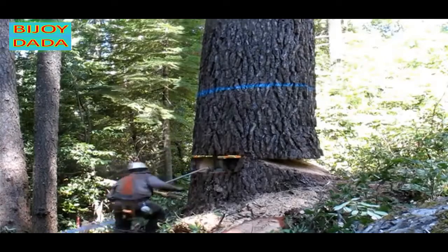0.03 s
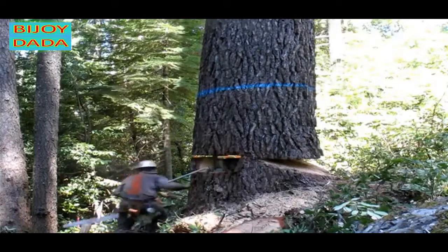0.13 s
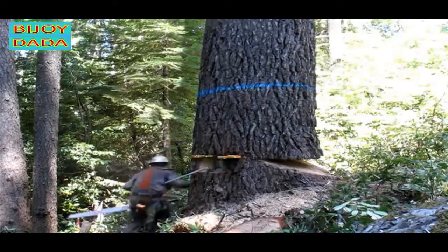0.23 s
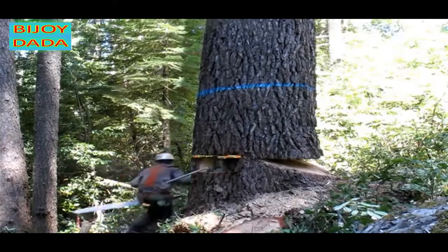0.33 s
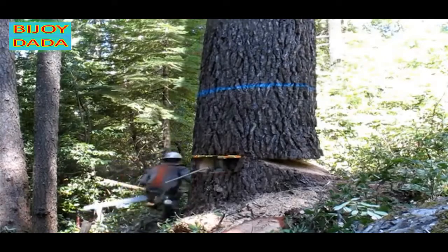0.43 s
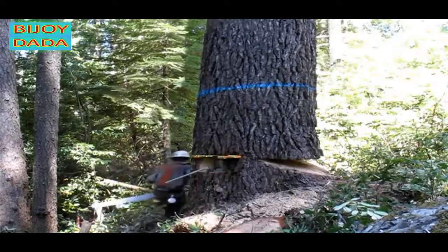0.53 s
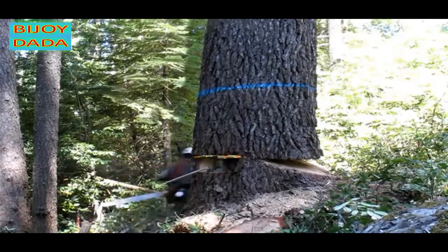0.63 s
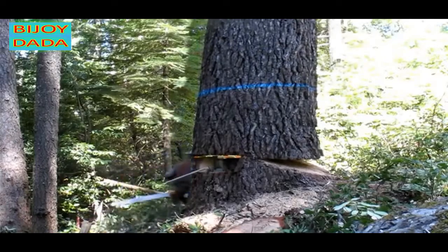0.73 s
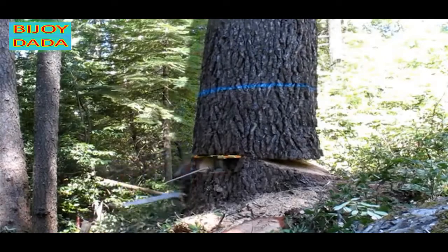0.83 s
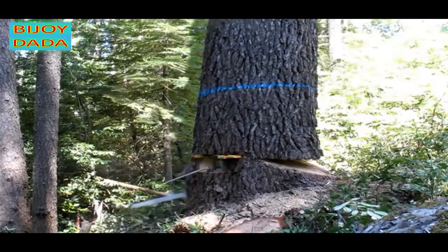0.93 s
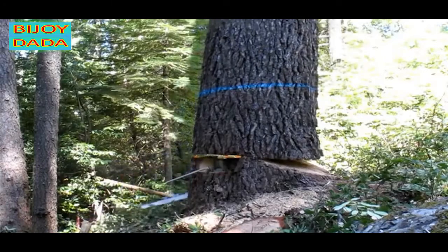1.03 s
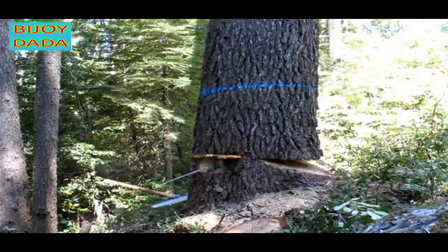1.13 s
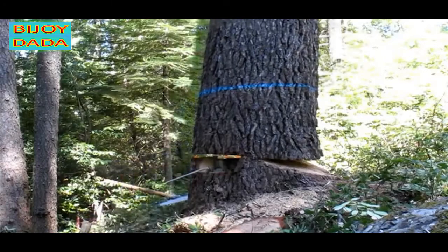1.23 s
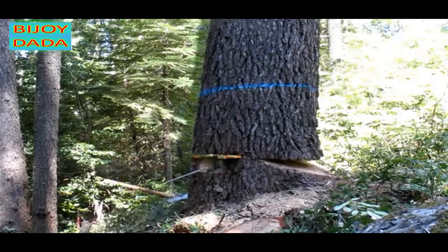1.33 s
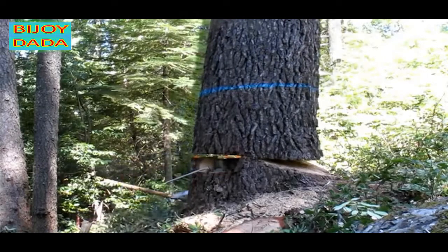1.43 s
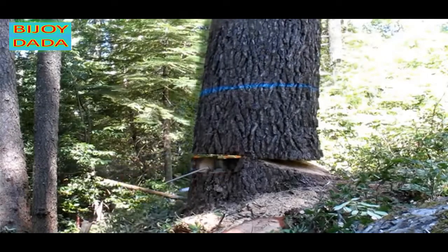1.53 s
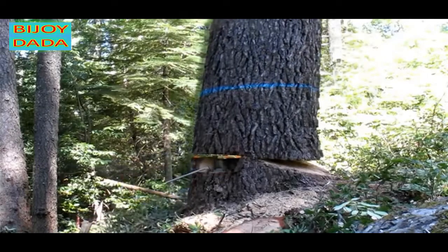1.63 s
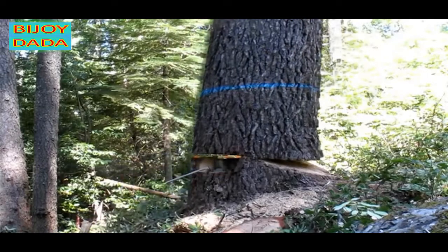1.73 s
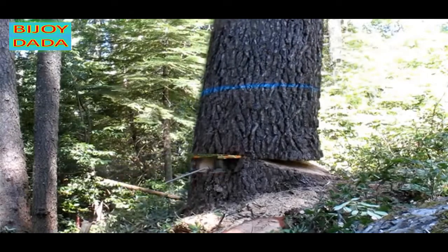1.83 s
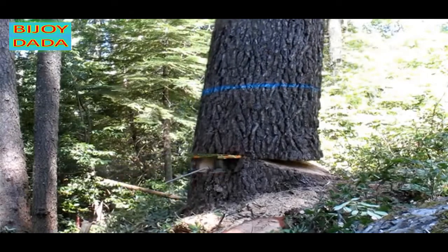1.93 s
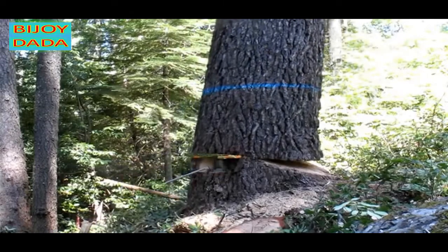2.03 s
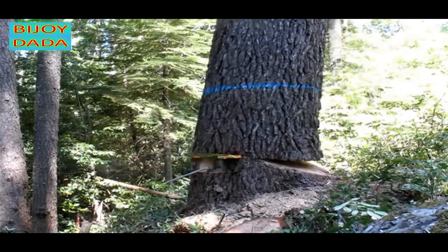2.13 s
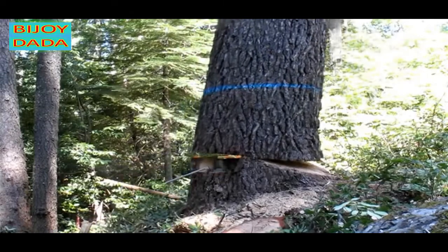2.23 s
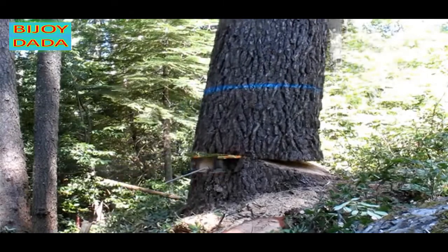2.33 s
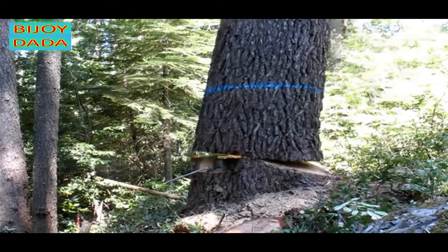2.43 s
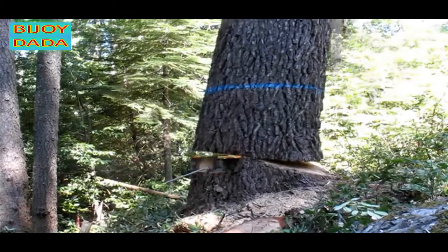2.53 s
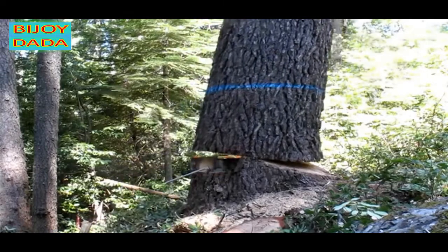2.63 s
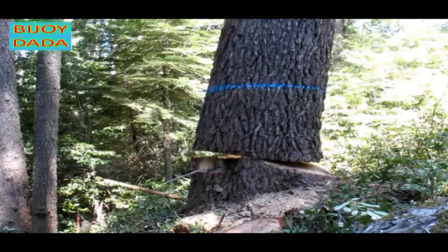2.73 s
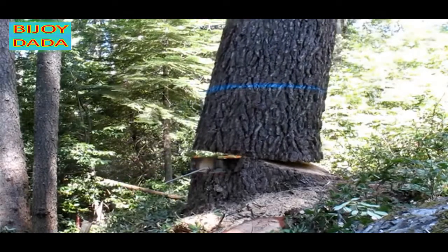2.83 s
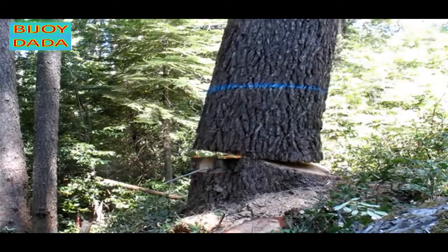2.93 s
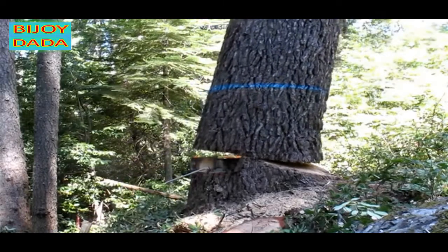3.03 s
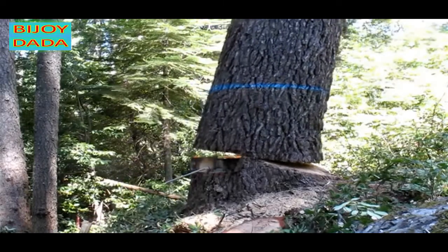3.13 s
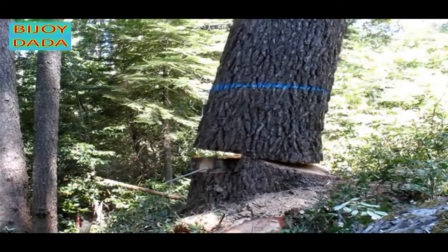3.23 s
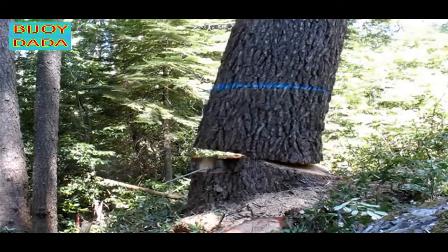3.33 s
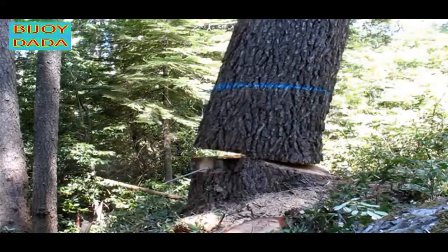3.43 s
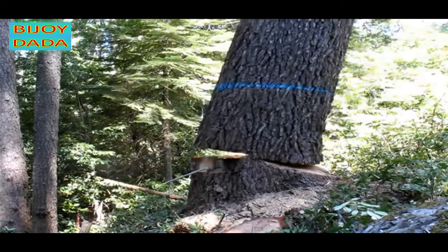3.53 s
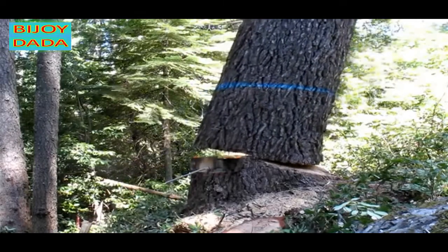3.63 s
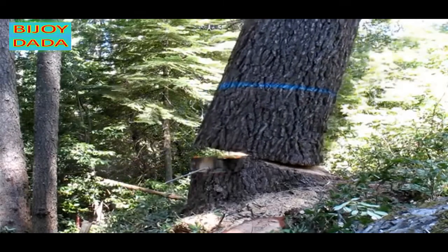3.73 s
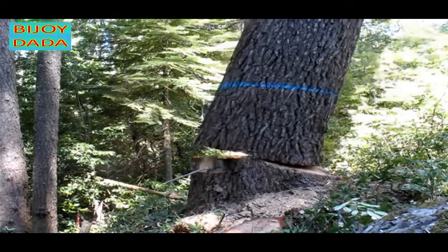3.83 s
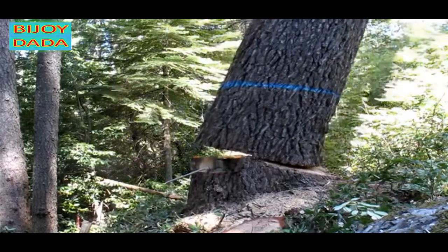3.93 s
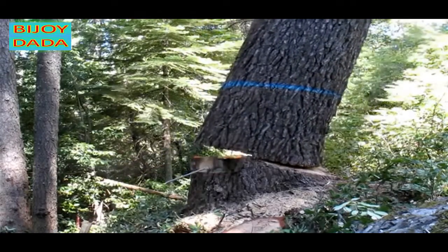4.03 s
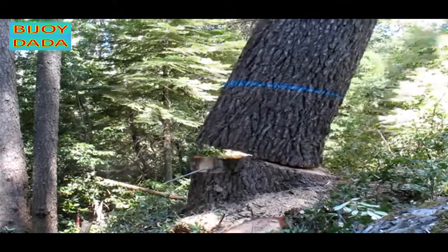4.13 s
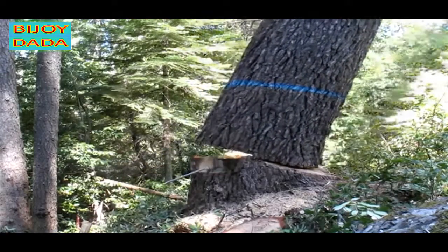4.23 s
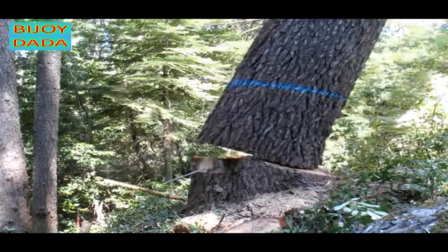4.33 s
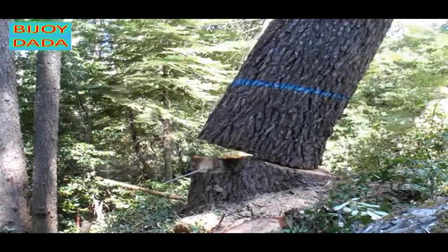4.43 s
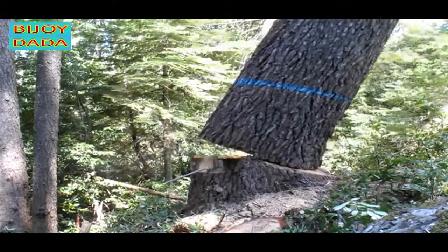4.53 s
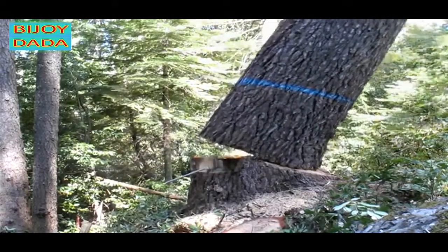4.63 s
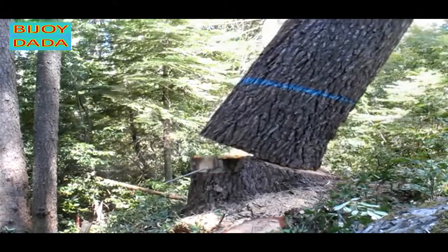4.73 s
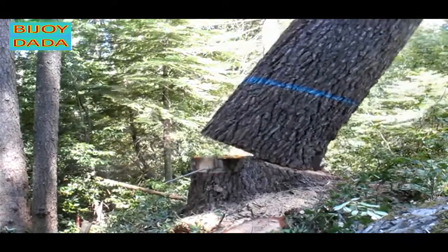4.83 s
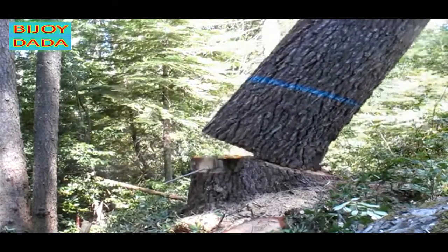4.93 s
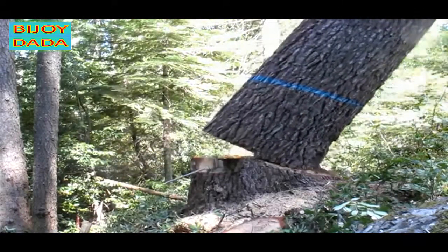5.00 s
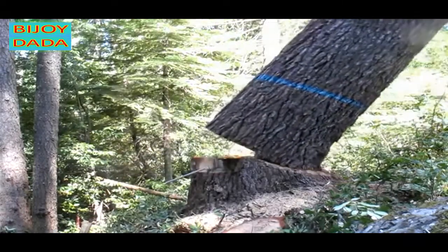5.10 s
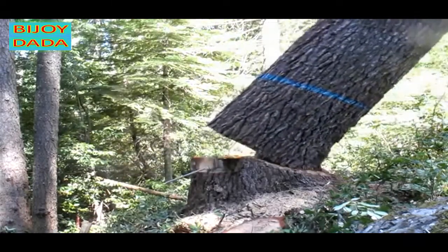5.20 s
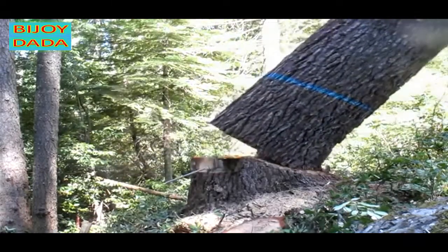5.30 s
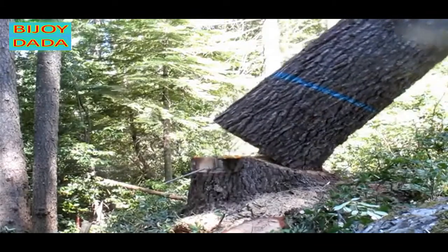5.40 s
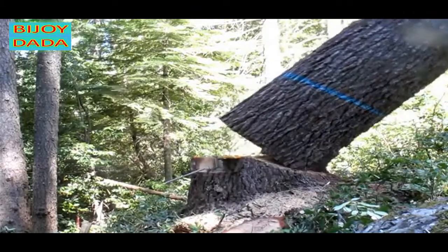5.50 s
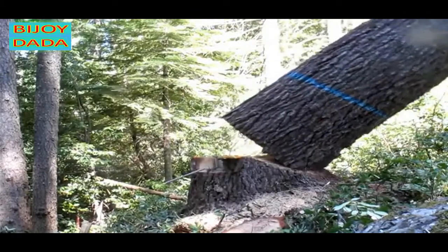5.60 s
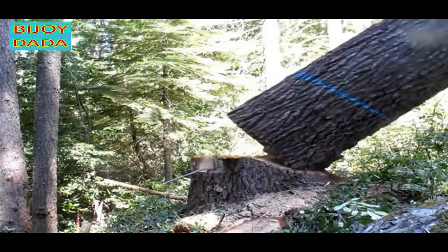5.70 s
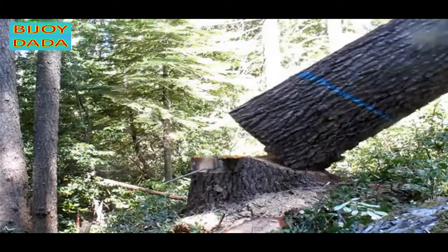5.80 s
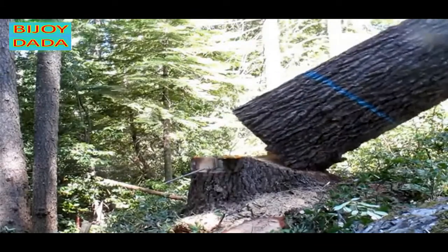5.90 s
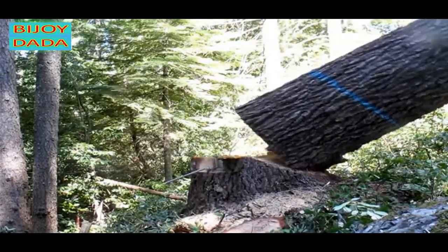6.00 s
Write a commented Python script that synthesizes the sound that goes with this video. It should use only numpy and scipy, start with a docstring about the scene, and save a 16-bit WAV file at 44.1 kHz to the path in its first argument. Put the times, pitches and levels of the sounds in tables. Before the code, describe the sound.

In a still forest, someone moves away through brush with faint rustles and small twig snaps. A big tree gives a sharp, hollow crack, then more, followed by a run of popping, splintering and tearing fibres as it tips. Its crown swishes into neighbouring trees with clattering, breaking branches, while the trunk bumps dully on the stump. The microphone is near the stump, and the cracks echo briefly.

```python
"""The hinge wood of a big conifer cracks, splinters and tears as the felled trunk tips.
Each break is a run of tiny slips: the piece knocks, the trunk thuds, fine fibres spit. The butt bumps on
the stump and the crown ploughs through its neighbours with swishing needles and breaking limbs.
Early on, the feller retreats through rustling brush, snapping twigs. Surrounding trunks scatter the
cracks back to a microphone near the stump, over still air and a faint electronic whine."""
import sys
import numpy as np
from scipy import signal
from scipy.fft import rfft, irfft
from scipy.io import wavfile
from scipy.ndimage import uniform_filter1d

SR = 44100
rng = np.random.default_rng(int(sys.argv[2]) if len(sys.argv) > 2 else 0)


def generate_wav(signal):
    """Clip the signal to [-1, 1] and save it as 16-bit WAV at the path in sys.argv[1]."""
    frames = np.transpose(np.atleast_2d(signal))
    scaled = np.clip(frames, -1, 1) * 32767
    pcm = np.round(scaled).astype(np.int16)
    wavfile.write(sys.argv[1], SR, pcm)


N = 267201
TIME_S = np.arange(N) / SR
HINGE_OPENS_S, HINGE_PARTS_S, CROWN_STRIKES_S = 2.52, 4.75, 5.282


# deep hinge breaks: (time [s], knock level [dB], knock pitch [Hz], length [ms])
HINGE_CRACKS = [(1.723, -23, 1630, 4.3), (2.3169, -24.5, 1170, 6.7), (2.5957, -32.5, 1680, 11),
                (2.9053, -28.5, 1170, 6.9), (3.1168, -29.5, 1650, 10.7), (3.3165, -37.5, 1250, 11),
                (3.4124, -32.5, 1250, 8.7), (3.5063, -40.5, 1670, 6.2), (3.7703, -38.5, 1760, 33),
                (3.7992, -33.5, 1340, 11), (3.9989, -44, 1540, 8.9), (4.201, -46.5, 1390, 6),
                (4.3951, -42.5, 1770, 18)]
# hinge resonances: (frequency [Hz], width [Hz], gain [dB])
HINGE_MODES = [(1024, 140, 2.5), (3210, 770, 2)]

def hinge_cracks(thud_re_knock_db=-4.5, creak_hz=1520, creak_ms=11):
    """The hinge cracks and rings hollow; its last strap creaks in small breaks: (direct, diffuse)."""
    creaks = [(s, -49 + db, creak_hz, creak_ms) for s, db in scattered(4.2, 5.1, spread_db=1, count=12)]
    direct, diffuse = breaks([(s, db, hz, db + thud_re_knock_db, -26 + 0.48 * db, ms)
                              for s, db, hz, ms in HINGE_CRACKS + creaks])
    hollow = sum(amp(db) * ring(direct, hz, width_hz) for hz, width_hz, db in HINGE_MODES)
    return np.array([amp(-3) * (direct + hollow), diffuse])


# loudest fibre snaps: (time [s], knock level [dB], spit level [dB])
FIBRE_SNAPS = [(2.2389, -44, -42.5), (2.478, -44, -46.5), (2.5397, -36.5, -35.5), (2.717, -26.5, -30.5),
               (2.7823, -38, -43), (2.8112, -43, -36.5), (2.8912, -39.5, -36), (3.0079, -44, -35.5),
               (3.1414, -39, -38.5), (3.1986, -50, -37.5), (3.2553, -43, -62), (3.393, -38.5, -35),
               (3.435, -38, -29.5), (3.5369, -39.5, -34.5), (3.6963, -45, -41.5), (3.9006, -47, -35.5),
               (3.9585, -38, -40), (3.981, -37, -33), (4.0387, -39.5, -42), (4.1209, -45.5, -45),
               (4.3633, -38, -32.5), (4.6726, -44, -38.5), (4.781, -43, -37.5), (4.8637, -42, -40.5),
               (5.058, -50, -36.5), (5.2443, -34, -33.5), (5.6377, -37.5, -30), (5.9869, -36, -32.5)]

def splinters(ref_db=-36.5, ref_hz=2110, ref_ms=2.04, thud_re_knock_db=-19):
    """Light fibres barely shake the trunk; stronger, thicker ones knock lower and longer."""
    strays = [(s, -52 + db, -45 + db)
              for s, db in scattered(HINGE_OPENS_S, CROWN_STRIKES_S, spread_db=4, count=26)]
    rows = []
    for s, db, spit_db in FIBRE_SNAPS + strays:
        excess_db = db - ref_db
        hz = ref_hz * 2 ** (-.012 * excess_db)
        length_ms = ref_ms * 2 ** (excess_db / 10.5)
        rows.append((s, db, hz, db + thud_re_knock_db, spit_db, length_ms))
    return breaks(rows)


def breaks(rows):
    """Fractures heard directly, and diffusely: averaging over all directions blurs slips and modes."""
    direct, diffuse = np.zeros((2, N))
    for s, *blow, length_ms in rows:
        add(direct, s, fracture(slip_run(length_ms), *blow, ringing=2.2))
        add(diffuse, s, fracture(signal.unit_impulse(3072), *blow, ringing=.4))
    return np.array([direct, diffuse])


# trunk resonances: (frequency [Hz], width [Hz], gain [dB])
TRUNK_MODES = [(88.5, 48, -16), (246.4, 39, -7), (373, 79, -6.5), (450.5, 110, -1.5), (568, 197, -4),
               (707, 52, 0.5), (1071, 96, -16)]
# fine-fibre spectrum: (frequency [Hz], gain [dB])
SPIT_SPECTRUM = [(1000, -38), (2800, -12), (4200, 1.5), (7000, -2), (11000, -0.5), (14000, -5)]

def fracture(slips, knock_db, knock_hz, thud_db, spit_db, ringing):
    """Slips make the piece knock, the trunk thud and fine fibres spit. Levels are rms over 10 ms."""
    bending = ring(slips, knock_hz, .17 * knock_hz) + .7 * ring(slips, 1.7 * knock_hz, .3 * knock_hz)
    knock = ring(ringing * bending + slips, knock_hz, 2.17 * knock_hz)
    wood_absorption = signal.butter(3, min(2.25 * knock_hz, SR / 3), fs=SR, output="sos")
    knock = signal.sosfilt(wood_absorption, knock)
    thud = sum((-1) ** k * amp(db) * ring(slips, hz, width_hz)
               for k, (hz, width_hz, db) in enumerate(TRUNK_MODES))
    spit = colour(slips, SPIT_SPECTRUM, size=512)
    parts = (knock, knock_db), (thud, thud_db), (spit, spit_db)
    return sum(amp(db) * part / np.sqrt(np.sum(part ** 2) / (SR / 100)) for part, db in parts)


def slip_run(length_ms, size=3072):
    """A brief burst of tiny slips, whitened to leave no deep spectral gaps."""
    fade = np.exp(-(np.arange(size) * 1000 / SR / max(length_ms, .3)) ** 1.3)
    run = rng.standard_normal(size) * fade
    for _ in range(2):
        spectrum = rfft(run)
        run = irfft(spectrum / (np.abs(spectrum) + 1e-9) ** .6) * np.sqrt(fade)
    return run


# fibre strips ripping out: (time [s], length [s], level [dB])
STRIP_RIPS = [(2.759, 0.058, -42), (3.146, 0.18, -45.5), (3.395, 0.2, -44.5), (3.785, 0.054, -43),
              (3.957, 0.048, -41.5), (4.105, 0.033, -50)]
# fibre and needle spectrum: (frequency [Hz], gain [dB])
TEAR_SPECTRUM = [(300, -13.5), (1200, -7.5), (2500, -2), (4000, -0.5), (7000, -2.5), (11000, -0.5),
                 (13000, -5)]

def tearing_and_swish(thins_from_s=4.3, thinning_db_per_s=13):
    """Tearing hinge fibres, then sweeping needles: a hiss with clusters of sharper ticks."""
    hiss = grains(rate_hz=6000, spread_db=2.5, length_ms=.8) * amp(.7 * walk(40))
    ticks = grains(rate_hz=110 * amp(6 * walk(25)), spread_db=5.5, length_ms=.9)
    ticks = ticks + amp(-5.5) * undergrowth(ticks)
    texture = unit(colour(hiss + amp(-3.5) * ticks, TEAR_SPECTRUM))
    steady_tear = (HINGE_OPENS_S, HINGE_PARTS_S - HINGE_OPENS_S, -50.5)
    fibres_left = amp(-thinning_db_per_s * np.maximum(TIME_S - thins_from_s, 0))
    rips = swells([steady_tear, *STRIP_RIPS], attack_s=0.013, release_s=0.041) * fibres_left
    needles = crown_gain(start_s=4.5, lead_s=0.067, db_per_s=31, surge_db=3, surge_s=-3, full_db=-35.5)
    strike_swish = swells([(5.3, 0.044, -38.5)], attack_s=0.024, release_s=.08)
    return texture * np.hypot(rips, np.hypot(needles, strike_swish))


# butt on stump: (time [s], peak level [dB], pitch [Hz])
BUTT_BUMPS = [(2.319, -27, 460), (3.799, -30, 374), (5.28, -28.5, 202), (5.31, -28, 170), (5.598, -32, 355),
              (5.655, -26, 370), (5.829, -27.5, 380), (5.969, -20.5, 295)]

def butt_bumps():
    """The heavy butt shifts on the stump, then bumps dully as the notch closes."""
    track = np.zeros(N)
    for s, db, hz in BUTT_BUMPS:
        blow = ring(slip_run(length_ms=10), hz, 0.83 * hz)
        blow = ring(blow, hz, 3.3 * hz)
        add(track, s, amp(db) * blow / np.abs(blow).max())
    return track


# branches breaking in the crown: (time [s], knock level [dB], knock pitch [Hz])
LIMB_BREAKS = [(5.3207, -37, 2030), (5.3729, -28, 1550), (5.4231, -35, 1290), (5.4838, -32.5, 1100),
               (5.6153, -31.5, 1540), (5.6553, -37, 1310), (5.7184, -35, 1470), (5.7684, -32.5, 2100)]

def limb_breaks(thud_re_knock_db=-21, spit_re_knock_db=-10.5, length_ms=5.3):
    """Branches break far off: mostly knock, little thud or spit."""
    return breaks([(s, db, hz, db + thud_re_knock_db, db + spit_re_knock_db, length_ms)
                   for s, db, hz in LIMB_BREAKS])


# colliding-stick spectrum: (frequency [Hz], gain [dB])
STICK_SPECTRUM = [(300, -34.5), (800, -9), (1100, -4.5), (1500, -1), (2100, -9), (2800, -9), (4500, -12),
                  (10000, -20.5)]

def stick_clatter():
    """Sticks of many sizes pop and knock together, surging as the crown strikes."""
    crunch = grains(rate_hz=1500, spread_db=3, length_ms=3)
    pops = sum(ring(grains(rate_hz=70, spread_db=3, length_ms=2), hz, hz / 6)
               for hz in np.geomspace(1100, 3000, 6))
    gain = crown_gain(start_s=4.6, lead_s=-0.013, db_per_s=8.5, surge_db=12, surge_s=0.04, full_db=-35)
    return unit(colour(crunch + .55 * unit(pops), STICK_SPECTRUM)) * gain


# heavy-limb spectrum: (frequency [Hz], gain [dB])
THUMP_SPECTRUM = [(20, -22), (50, -6.5), (110, -7.5), (180, -2), (380, 3), (550, -1.5), (750, -7),
                  (1600, -37)]

def limb_thumps():
    """Heavy limbs collide and thump under the clatter."""
    blows = grains(rate_hz=260, spread_db=3.5, length_ms=5)
    gain = crown_gain(start_s=4.5, lead_s=0.057, db_per_s=8, surge_db=18.5, surge_s=0.34, full_db=-41)
    return unit(colour(blows, THUMP_SPECTRUM)) * gain


def crown_gain(start_s, lead_s, db_per_s, surge_db, surge_s, full_db, fade_s=0.033):
    """The crown grazes ever harder, then surges around the strike; a negative surge_s sags instead."""
    to_strike_s = CROWN_STRIKES_S - lead_s - TIME_S
    withheld = np.clip(.5 + to_strike_s / surge_s, 0, 1)
    db = full_db - surge_db * withheld - db_per_s * np.maximum(to_strike_s, 0)
    return amp(db) * np.clip((TIME_S - start_s) / fade_s, 0, 1)


# twigs underfoot: (time [s], knock level [dB], knock pitch [Hz], spit level [dB])
TWIG_SNAPS = [(0.1255, -60, 1910, -50), (0.1788, -56.5, 2200, -52), (0.286, -77, 2740, -63),
              (0.4111, -61.5, 2710, -51.5), (0.5491, -58, 2000, -69), (0.73, -67, 2500, -53),
              (0.9976, -60.5, 795, -65), (1.5, -62, 2460, -53), (1.553, -57, 2450, -70)]

def twig_snaps(thud_re_knock_db=-18.5, length_ms=1.7):
    """Dry twigs snap short and light under the feller's boots."""
    return breaks([(s, db, hz, db + thud_re_knock_db, spit_db, length_ms)
                   for s, db, hz, spit_db in TWIG_SNAPS])


# strides sweeping brush aside: (time [s], length [s], level [dB])
BRUSH_STRIDES = [(0.485, 0.025, -51.5), (0.68, 0.096, -51), (1.25, 0.15, -55), (1.56, 0.11, -53),
                 (1.88, .1, -53.5)]
# rustle spectrum: (frequency [Hz], gain [dB])
BRUSH_SPECTRUM = [(200, -13.5), (1000, -11), (2200, -8), (4000, -2.5), (6500, -3.5), (10500, 1),
                  (13000, -0.5)]

def brush(start_s=0.614, end_s=2.56, wading_db=-59.5, thickening_db_per_s=2.5, stirring_db=-67.5):
    """Ever thicker brush slides over clothing, swelling with each stride; leaves stir throughout."""
    rustle = grains(rate_hz=6300, spread_db=2.5, length_ms=0.84) * amp(0.23 * walk(53.5))
    edges = dict(attack_s=0.025, release_s=0.032)
    wading = swells([(start_s, end_s - start_s, wading_db)], **edges)
    wading *= amp(thickening_db_per_s * (TIME_S - start_s))
    strides = swells(BRUSH_STRIDES, **edges)
    gain = np.sqrt(wading ** 2 + strides ** 2 + amp(stirring_db) ** 2)
    return unit(colour(rustle, BRUSH_SPECTRUM)) * gain


def gear_clink(start_s=.126, peak_db=-49, hz=1870, t60_s=0.043):
    """A hard piece of the feller's gear is knocked and rings in one mode."""
    age_s = np.maximum(TIME_S - start_s, 0)
    return amp(peak_db) * np.sin(2 * np.pi * hz * age_s) * np.exp(-np.log(1000) * age_s / t60_s)


def undergrowth(x, decay_s=.014, size=4096):
    """Bark, stump and ground within a few metres give each snap a short bright tail."""
    t = np.arange(size) / SR
    response = rng.standard_normal(size) * np.exp(-t / decay_s) * (t > .002)
    return signal.fftconvolve(x, response / np.linalg.norm(response))[:N]


# forest reverberation: (frequency [Hz], gain [dB], t60 [s])
FOREST_BANDS = [(60, 3, 0.47), (129, -0.5, 0.51), (312, -10, 0.72), (650, -11, 1.62), (1170, -8, 0.95),
                (1880, -5.5, 1.1), (3600, -5, 0.54), (9000, -6.5, 1.1)]

def forest(x, near_db=-4, near_s=0.04, far_s=0.034, size=65536):
    """Near stems answer at once; the wall of trees swells a little later and dies away."""
    t = np.arange(size) / SR
    echoes = rfft(grains(rate_hz=3000, spread_db=2, length_ms=.8)[:size])
    bin_octaves = np.log2(np.maximum(np.arange(len(echoes)) * SR / size, 1))
    band_octaves = np.log2([hz for hz, _, _ in FOREST_BANDS])
    near = amp(near_db) * np.exp(-t / near_s)
    far = 1 - np.exp(-(t / far_s) ** 2)
    response = 0
    for share, (_, db, t60_s) in zip(np.eye(len(FOREST_BANDS)), FOREST_BANDS):
        band = irfft(echoes * np.interp(bin_octaves, band_octaves, share))
        fade = (near + far) * (t > .004) * np.exp(-np.log(1000) * t / t60_s)
        response = response + amp(db) * band * fade / np.sqrt(np.sum(fade ** 2))
    return signal.fftconvolve(x, response)[:N]


# forest air spectrum: (frequency [Hz], gain [dB])
AIR_SPECTRUM = [(15, -39), (25, -8.5), (231, -14.5), (975, -10), (1480, -16.5), (6250, -16), (6760, -14),
                (7310, -22.5), (11400, -14), (13000, -17)]

def air_and_whine(air_db=-68, whine_db=-69.5, whine_hz=6829):
    """Still forest air and a faint electronic whine."""
    air = unit(colour(rng.standard_normal(N), AIR_SPECTRUM)) * amp(air_db + walk(2) / 2)
    whine = np.sqrt(2) * np.sin(2 * np.pi * whine_hz * TIME_S)
    return air + amp(whine_db) * whine


def amp(db):
    """Decibels to gain."""
    return 10 ** (np.asarray(db) / 20)


def unit(x):
    """Scale to rms 1."""
    return x / np.sqrt(np.mean(x ** 2))


def colour(x, points, size=4096):
    """Minimum-phase filter through (frequency [Hz], gain [dB]) points."""
    hz, db = np.transpose(points)
    bins_hz = np.maximum(np.arange(size // 2 + 1) * SR / size, 1)
    gain = amp(np.interp(np.log(bins_hz), np.log(hz), db))
    cepstrum = irfft(np.log(gain))
    cepstrum[1:size // 2] *= 2
    cepstrum[size // 2 + 1:] = 0
    return signal.fftconvolve(x, irfft(np.exp(rfft(cepstrum))))[:len(x)]


def ring(x, hz, width_hz):
    """One resonance, gain 1 at its centre."""
    return signal.lfilter(*signal.iirpeak(hz, hz / width_hz, fs=SR), x)


def walk(rate_hz):
    """Smooth random drift, spread near 1."""
    hold = int(SR / rate_hz)
    steps = np.repeat(rng.standard_normal(N // hold + 1), hold)
    return 1.3 * uniform_filter1d(uniform_filter1d(steps, hold), hold)[:N]


def grains(rate_hz, spread_db, length_ms):
    """Tiny random breaks, many weak and a few strong, each a spurt of noise."""
    sizes = amp(spread_db * np.minimum(rng.standard_exponential(N), 3))
    power = (rng.random(N) < rate_hz / SR) * sizes ** 2
    power = signal.lfilter([1], [1, -np.exp(-2000 / (length_ms * SR))], power)
    return unit(np.sqrt(power) * rng.standard_normal(N))


def swells(rows, attack_s, release_s):
    """Rise-hold-decay gain from (time [s], length [s], level [dB]) rows, summed in power."""
    power = 0
    for s, length_s, db in rows:
        rise = np.clip((TIME_S - s) / attack_s, 0, 1)
        fall = np.exp(-np.maximum(TIME_S - s - length_s, 0) / release_s)
        power = power + (amp(db) * rise * fall) ** 2
    return np.sqrt(power)


def scattered(start_s, end_s, spread_db, count):
    """One random event per equal slot: (time [s], level offset [dB])."""
    return [(start_s + (end_s - start_s) * (k + when) / count, spread_db * (2 * size - 1))
            for k, (when, size) in enumerate(rng.random((count, 2)))]


def add(track, s, sound):
    """Mix a sound in at time s."""
    start = int(s * SR)
    track[start:start + len(sound)] += sound[:N - start]


def scene():
    """Breaking wood, direct and scattered by the forest, over rustle, clatter and air."""
    cracks, fibres, limbs, twigs = hinge_cracks(), splinters(), limb_breaks(), twig_snaps()
    direct = (cracks + fibres + limbs + twigs)[0] + butt_bumps()
    near = undergrowth((fibres + twigs)[1]) * amp(-5.5)
    far = forest((amp(-0.5) * cracks + amp(-5) * fibres + amp(0.5) * limbs + amp(-1) * twigs)[1])
    feller = gear_clink() + brush()
    fall = tearing_and_swish() + stick_clatter() + limb_thumps()
    return (direct + near + far + feller + fall + air_and_whine())[None]


# microphone response: (frequency [Hz], gain [dB])
MIC_RESPONSE = [(20, 0), (11800, 0), (12600, -4), (13600, -21), (15000, -15), (16000, -19), (22000, -30)]

def record(dry, ceiling=.18, top_hz=16200):
    """The microphone rounds off the sharpest peaks and loses the top treble."""
    rounded = dry[0] / (1 + (dry[0] / ceiling) ** 4) ** (1 / 4)
    lowpass = signal.ellip(8, .2, 70, top_hz, fs=SR, output="sos")
    return signal.sosfilt(lowpass, colour(rounded, MIC_RESPONSE))[None]


dry = scene()
out = record(dry)
generate_wav(out)
```